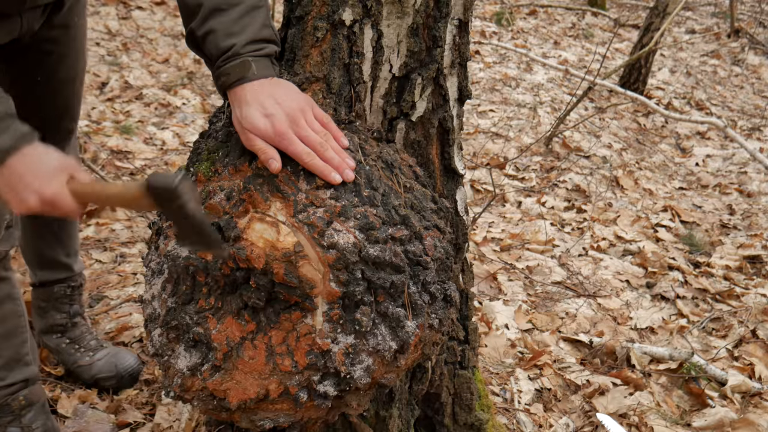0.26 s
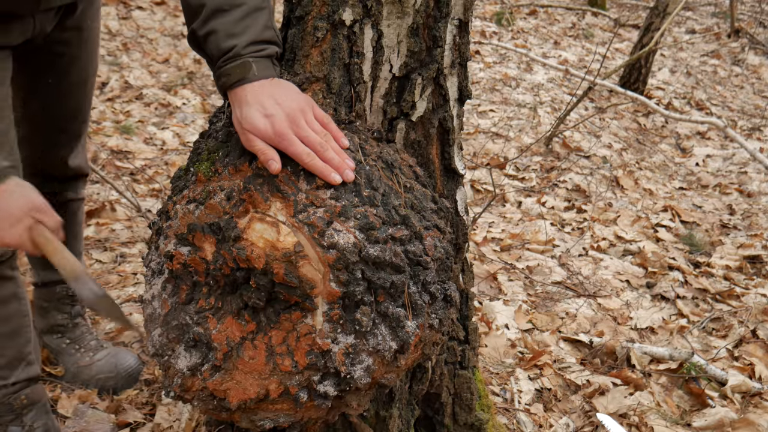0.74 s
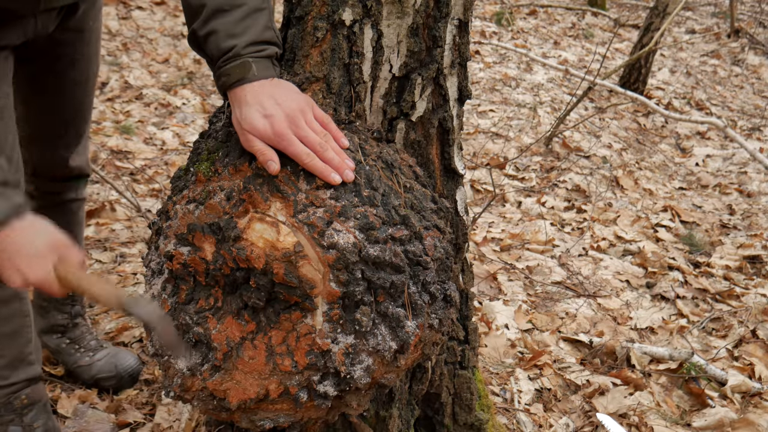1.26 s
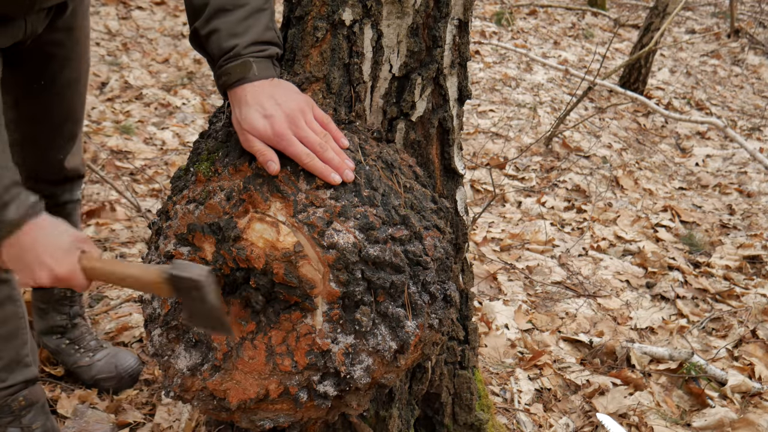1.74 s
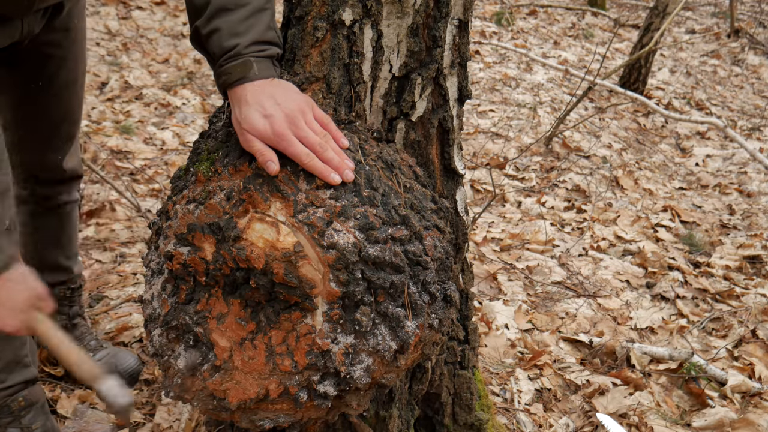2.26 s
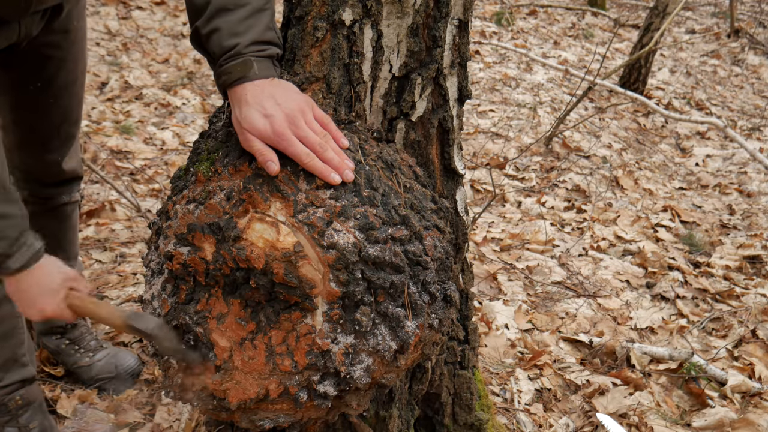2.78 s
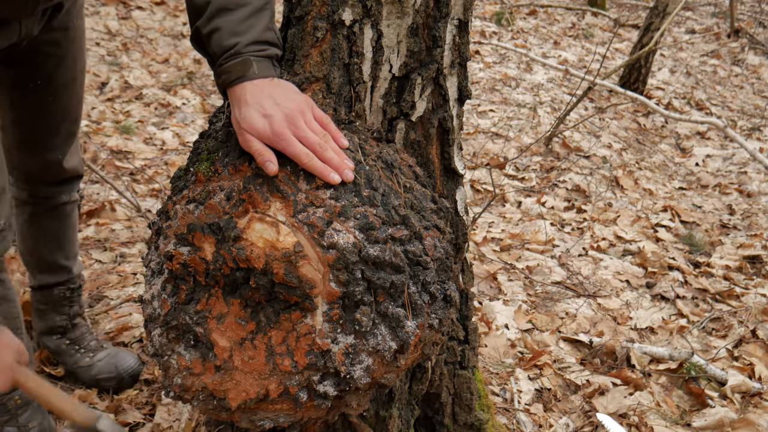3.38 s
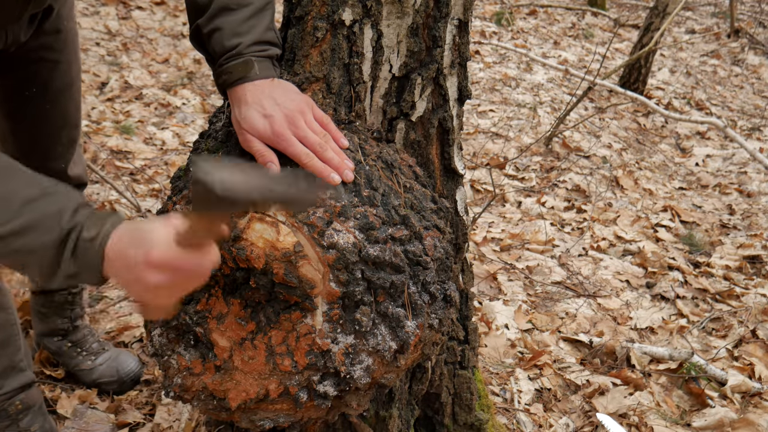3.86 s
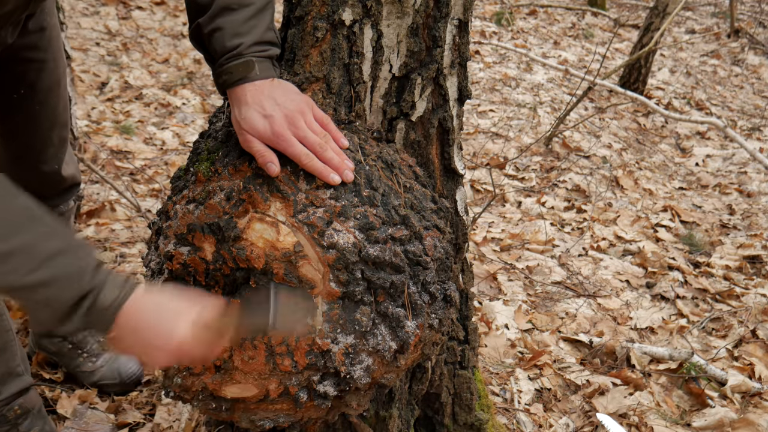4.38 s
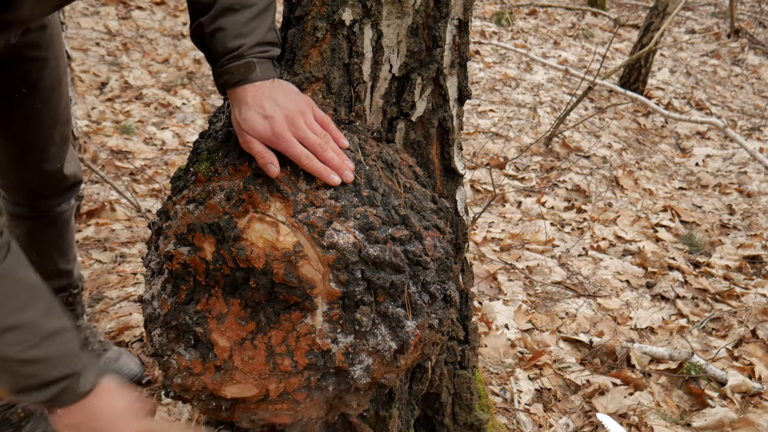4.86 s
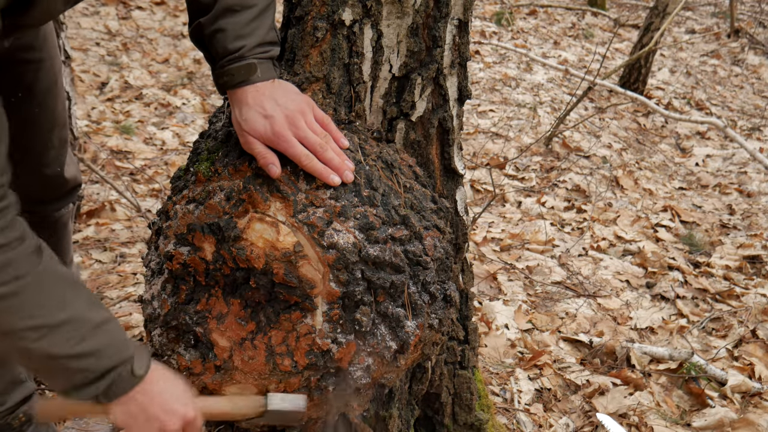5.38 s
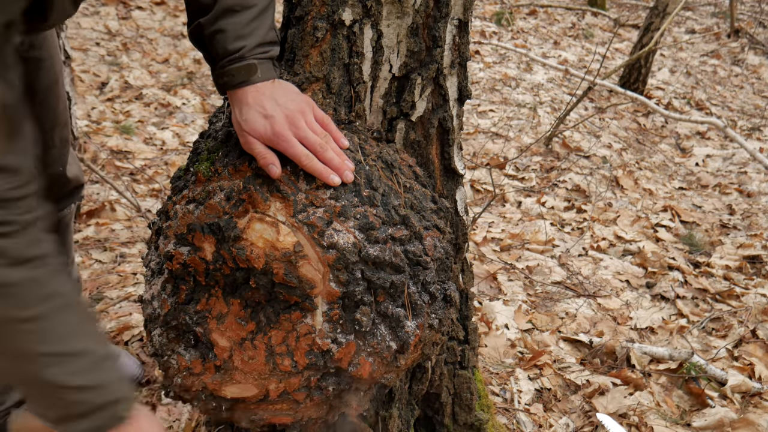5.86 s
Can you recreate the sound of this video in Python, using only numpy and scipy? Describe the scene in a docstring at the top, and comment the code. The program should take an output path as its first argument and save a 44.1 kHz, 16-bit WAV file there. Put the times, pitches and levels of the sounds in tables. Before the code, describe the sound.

Close, loud, cracking hatchet blows on a crusty tree growth, with sleeve swishes, falling chips and leaf crunches between them, over faint forest air.

```python
"""In a quiet forest, a hatchet chops a hard, crusty burl on a living tree, close to a stereo microphone.
Noise bursts crack the crust; damped modes ring crust, burl and steel; the loudest peaks clip flat.
Chips tick and ring; shaped noise makes the sleeve's swishes, dry leaves crunching and low booms.
Forest air and a light breeze lie behind as steady noise; the trees around add faint echoes to the blows."""
import sys
import numpy as np
from scipy import signal
from scipy.fft import rfft, irfft, next_fast_len
from scipy.io import wavfile
from scipy.ndimage import uniform_filter1d

SR = 44100
rng = np.random.default_rng(int(sys.argv[2]) if len(sys.argv) > 2 else 0)


def put_to_file(sound):
    """Save the sound as 16-bit audio at rate SR, in the file named by the first command-line argument."""
    columns = np.atleast_2d(sound).T  # one column per channel
    safe = np.clip(columns, -1, 1)
    whole_steps = np.round(safe * 32767)
    wavfile.write(sys.argv[1], SR, whole_steps.astype(np.int16))


N = 269892  # length in samples

# The forest air behind everything. Each row: frequency in Hz, relative level in dB.
FOREST_SPECTRUM = [(30, 9), (100, -5), (300, -5), (1000, -12.5), (2000, -13), (5000, -21.5), (15000, -30)]
# Light breeze on the microphone. Each row: frequency in Hz, relative level in dB.
BREEZE_SPECTRUM = [(8, -14), (20, -12), (40, -1.5), (100, -19), (400, -25.5), (2000, -45), (15000, -44)]
# Low booms around the blows and shifts of weight. Each row: start in seconds, level before the
# common trim in dB, decay time constant in seconds.
BOOMS = [(0, -41, 0.26), (.26, -37, 0.084), (.61, -39, 0.25), (1.07, -28.5, 0.12), (1.61, -32, 0.18),
         (1.89, -28, 0.048), (2.03, -40.5, 0.38), (2.71, -37, 0.2), (3.0, -30, 0.072), (3.3, -35, 0.12),
         (4.02, -31, 0.13), (4.21, -25, 0.097), (4.5, -31, 0.082), (4.72, -30.5, 0.15), (4.92, -35, 0.14),
         (5.23, -32.5, 0.14), (5.78, -45.5, 0.21)]
# Colour of the booms. Each row: frequency in Hz, relative level in dB.
BOOM_SPECTRUM = [(18, -59), (28, -21), (35, -1.5), (48, -32), (67, -6.5), (77, -11.5), (91, 1.5), (100, -4),
                 (115, -15.5), (160, -21.5), (400, -57), (2000, -79)]
# Dull thuds between the blows. Each row: start in seconds, pitch in Hz, peak level in dB,
# time from start to peak in seconds.
THUDS = [(0.225, 193, -26.5, 0.023), (1.914, 94, -28.5, 0.044), (3.039, 85, -25, 0.031),
         (4.236, 96.4, -28, 0.045), (4.748, 93, -22.5, 0.024)]
# The sleeve swishing as the arm moves. Each row: loudest moment in seconds, level before the common
# gains in dB, half length (standard deviation of the bell curve) in seconds.
SWISHES = [(0.018, -38, 0.075), (.44, -39, 0.068), (0.96, -36.5, 0.13), (1.456, -44, 0.25),
           (2.05, -37, 0.16), (2.382, -39.5, 0.11), (2.567, -39, 0.11), (2.966, -45, 0.14),
           (3.125, -44, 0.069), (3.453, -47, 0.24), (4.152, -39.5, 0.038), (4.505, -46.5, 0.022),
           (4.91, -45, 0.084), (5.056, -48, 0.15), (5.392, -39.5, 0.051), (5.58, -40, 0.14),
           (5.972, -38.5, 0.034)]
# Dry leaves and crumbs crunching. Each row: start in seconds, level before the common gains in dB,
# decay time constant in seconds, hiss relative to the body in dB before those gains.
CRUNCHES = [(.348, -27.5, .02, -7.5), (0.365, -28.5, .018, -9), (.595, -32.5, 0.018, -2.5),
            (0.784, -36.5, 0.047, -10), (.903, -28.5, 0.029, -18), (1.3, -60, 0.02, -13),
            (1.735, -35, 0.018, -14), (1.815, -34.5, 0.029, -11), (1.903, -25.5, 0.017, -10),
            (1.935, -31.5, 0.028, 0), (2.256, -30.5, 0.019, -12), (2.495, -24.5, 0.019, -14),
            (2.898, -27, 0.026, -10.5), (3.21, -32, 0.0078, 3), (3.298, -33.5, 0.018, 1),
            (3.33, -32, 0.028, -17), (4.03, -37, 0.011, 5), (4.225, -31.5, 0.037, -15),
            (4.277, -30, 0.04, -13), (4.713, -26.5, 0.079, -9), (5.221, -29.5, 0.013, -5),
            (5.318, -29.5, 0.029, -8), (5.774, -36, 0.06, -10), (5.885, -35, 0.021, -17)]
# Body of cloth and leaves. Each row: frequency in Hz, relative level in dB.
RUSTLE_SPECTRUM = [(25, -34), (80, -24), (250, -2.5), (500, -1.5), (1400, -1), (2800, -4), (5000, -5.5),
                   (6500, -17.5), (12000, -54)]
# Crisp top of cloth and leaves. Each row: frequency in Hz, relative level in dB.
LEAF_HISS_SPECTRUM = [(2500, -26), (5000, -3), (7000, -5), (10000, -8.5), (13000, -14), (15500, -25)]
# The largest chips and twigs landing. Each row: start in seconds, level before the common gain in dB,
# centre of the tick in Hz, length before stretching in seconds, ring in Hz, ring relative to the tick
# in dB before the ring gain.
LARGE_CHIPS = [(0.011, -23, 2150, 0.002, 2900, -3), (.23, -24, 1640, 0.0051, 910, -3.5),
               (0.251, -19, 2150, 0.0043, 1095, 0), (.287, -24, 3620, 0.0028, 3310, -3),
               (.326, -28.5, 4100, 0.0015, 3560, -5), (0.482, -25, 1600, 0.0039, 1025, -4),
               (.676, -21.5, 1500, 0.0023, 1200, -1.5), (0.706, -28, 1920, 0.0046, 1850, -1),
               (.733, -23.5, 3400, 0.0011, 3750, 3), (0.766, -19.5, 3100, 0.0037, 2100, 2),
               (.787, -15, 1730, .0052, 664, -6), (.826, -22.5, 2300, .0046, 5000, -5),
               (0.994, -24.5, 2400, 0.0022, 734, -7), (1.173, -22.5, 1760, 0.0045, 4970, -6.5),
               (1.289, -24.5, 4000, 0.002, 4640, 1), (1.315, -24, 2670, 0.0033, 5900, -11),
               (1.582, -15, 2170, 0.0029, 820, -4.5), (1.745, -21.5, 2420, 0.00085, 1980, -2),
               (1.842, -21.5, 2420, 0.0035, 2480, -6), (2.17, -22.5, 2500, 0.0016, 2900, -4),
               (2.21, -12.5, 1880, 0.00082, 1800, 6), (2.226, -25, 3900, 0.0017, 4830, 11),
               (2.315, -19, 1010, 0.0028, 510, 0.5), (2.417, -20, 1840, 0.0023, 770, -3),
               (2.426, -24.5, 1070, 0.0051, 1000, 0), (2.818, -26.5, 2210, 0.0044, 1290, -6),
               (3.025, -27.5, 1300, 0.011, 536, -7.5), (3.041, -21, 2200, 0.0025, 1340, -3),
               (3.08, -23, 1190, 0.0049, 870, -3), (3.364, -21.5, 4000, 0.0036, 4620, 0),
               (3.452, -27, 1170, 0.00085, 1390, -22), (4.181, -27.5, 700, 0.003, 470, 4),
               (4.22, -19, 2970, 0.0016, 3610, 2.5), (4.314, -23.5, 1950, 0.0025, 3150, -11),
               (4.391, -23, 1940, 0.0015, 1740, -5), (4.738, -22, 2300, 0.0022, 1870, 11),
               (4.81, -24.5, 1700, 0.0088, 640, -6.5), (5.014, -28.5, 2400, 0.0065, 2470, -2.5),
               (5.283, -22, 3380, 0.0017, 2910, -3), (5.306, -24, 2700, 0.0047, 2840, -7),
               (5.343, -21, 2180, 0.0042, 2040, -10), (5.38, -23, 2280, 0.0041, 3250, -6),
               (5.404, -23, 1670, 0.0063, 1280, -13), (5.433, -24.5, 2480, 0.0018, 4030, -3),
               (5.583, -19, 3070, 0.001, 3810, 2), (5.659, -29.5, 1600, 0.0013, 1350, 8),
               (5.786, -23, 1800, 0.0032, 1840, 1.5), (5.842, -25.5, 2560, 0.0024, 3200, -1),
               (5.891, -16.5, 1130, 0.0033, 838, -3)]
# Colour of a chip's tick before focusing. Each row: frequency in Hz, relative level in dB.
CHIP_SPECTRUM = [(30, -36), (100, 11), (500, 7), (1500, -1.5), (5000, -2.5), (6200, -5.5), (10000, -5),
                 (15500, -16.5)]
# Hatchet blows. Each row: start in seconds, crack level in dB, crack tilt in dB per octave, time the edge
# keeps biting in seconds, low crust note in Hz, its level in dB, high crust note in Hz, its level in dB,
# burl level in dB, pitch the burl favours in Hz, steel level in dB, crumbling level in dB.
BLOWS = [(0.0994, -3.5, -0.5, 0.0014, 1010, 2, 1565, -0.5, -14, 179, -18, -22.5),
         (0.562, -6.5, -0.5, 0.0011, 892, 3.5, 1699, 4, -20, 150, -18.5, -10),
         (1.0717, 0.5, 1, 0.002, 678, -5, 897, -1.5, -1, 384, -22, -43),
         (1.6017, -3.5, 1, 0.0046, 1270, -7.5, 1917, -0.5, -11.5, 407, -9, -25.5),
         (2.1166, -3, 1.5, 0.003, 710, -5, 2970, 0, -11.5, 316, -7, -19),
         (2.6984, -3.5, -0.4, 0.0052, 665, -12, 3405, 1.5, -11.5, 470, -18, -22),
         (3.197, -7.5, -0.5, 0.00075, 725, -5.5, 2420, -7.5, -18, 267, -35, -50),
         (3.203, -8, 1.5, 0.0044, 1010, -10, 2395, -0.5, -28, 280, -17, -15.5),
         (4.0136, -3.5, -2.5, 0.0031, 610, -4, 1046, -5.5, -9.5, 337, -26, -11),
         (4.609, -7.5, -1.7, 0.002, 710, -5, 1950, -2.5, -33, 169, -11, -33),
         (4.615, -3.5, 0.5, 0.0024, 1140, -12, 2570, -10, -14, 298, -13.5, -29),
         (4.6226, -22, -5, 0.0017, 1160, -18, 3200, -6.5, -29, 300, -19.5, -25),
         (4.6378, -16, 0, 0.0022, 1270, -12, 2230, -8, -20, 326, -22.5, -31),
         (5.186, -8, 0.3, 0.0072, 1816, -8.5, 3180, -1.5, -11.5, 272, -14, -17),
         (5.6899, -8, -0.4, 0.0049, 740, -8, 2730, -16, -15, 250, -12.5, -11.5)]
# Colour of the crack before tilting. Each row: frequency in Hz, relative level in dB.
CRACK_SPECTRUM = [(30, -46), (90, -14.5), (200, -15.5), (700, -2), (1400, -2), (2000, -0.5), (3200, 1),
                  (4300, -2), (5000, 0.5), (5900, -10.5), (7000, -3), (10000, -7), (15500, -19.5)]
# Each crust note is a tight cluster of modes. Each row: multiple of the note, level in dB, t60 in seconds.
CRUST_MODES = [(0.872, -16.5, 0.0255), (0.999, -2.5, 0.027), (1.102, -8.5, 0.036), (1.206, -3.5, 0.021)]
# The burl on its trunk. Each row: mode in Hz, level in dB, t60 in seconds.
BURL_MODES = [(189, -14.5, 0.14), (240.5, -12.5, 0.13), (276, 6, 0.024), (346, -10, 0.14),
              (427.7, -9.5, 0.13), (492, -16, 0.13), (643, -4.5, 0.082), (716, -22, 0.12)]
# The steel head, damped by the cut. Each row: mode in Hz, level in dB, t60 in seconds.
STEEL_MODES = [(1850, -13, 0.034), (2610, -19, 0.11), (2949, 3, 0.02), (3010, -1.5, 0.053),
               (3610, 4, 0.023), (3750, 3, 0.028), (4920, -15, 0.064), (4580, -27, 0.028),
               (6440, -8, 0.043), (6800, -20, 0.056)]
# Colour of the crumbling crust. Each row: frequency in Hz, relative level in dB.
CRUMBLE_SPECTRUM = [(50, -44), (200, -7), (1000, 0), (3800, 3.5), (5900, -6), (7200, 1), (11000, -8),
                    (15500, -17)]
# The steel head grazing the bark as it is drawn away. Each row: start in seconds, level in dB,
# decay time constant of the rub in seconds.
GRAZES = [(0.249, -35, 0.0022), (4.23, -50, 0.0029), (5.228, -22.5, 0.01), (5.283, -31.5, 0.004)]


def undb(db):
    """Turn decibels into an amplitude factor."""
    return 10 ** (np.asarray(db) / 20)


def unit(x):
    """Scale to rms 1."""
    return x / np.sqrt(np.mean(x ** 2) + 1e-18)


def colour(x, points):
    """Causal minimum-phase filter through (Hz, dB) points; the result has rms 1."""
    size = 2 * next_fast_len(len(x) // 2 + 1024, True)
    hz, db = np.transpose(points)
    f = np.maximum(np.fft.rfftfreq(size, 1 / SR), 1)
    level_db = np.interp(np.log(f), np.log(hz), db)
    # folding the cepstrum onto positive time makes the filter causal
    cepstrum = irfft(np.log(undb(level_db)))
    cepstrum[1:size // 2] *= 2
    cepstrum[size // 2 + 1:] = 0
    response = np.exp(rfft(cepstrum))
    return unit(irfft(rfft(x, size) * response)[:len(x)])


def add(track, s, sound):
    """Mix a sound in at time s."""
    i = max(int(s * SR), 0)
    track[i:i + len(sound)] += sound[:N - i]


def crackle(size, rate, spread_db, smooth):
    """Tiny fractures of very unequal strength, rate per second, over a smooth hiss."""
    strength = undb(spread_db * np.minimum(rng.exponential(size=size), 4.5))
    clicks = (rng.random(size) < rate / SR) * strength * rng.choice([-1, 1], size)
    return unit(unit(clicks) + smooth * rng.standard_normal(size))


def ring(modes, t, scatter_db, detune):
    """Damped modes; each point of impact weights and tunes them a little differently."""
    hz, db, t60 = np.transpose(modes)[:, :, None]
    weight, tuning, sign = rng.standard_normal((3, len(modes), 1))
    waves = np.sign(sign) * np.sin(2 * np.pi * hz * (1 + detune * tuning) * t)
    strength = undb(db + scatter_db * np.clip(weight, -1, 1))
    decay = np.exp(-np.log(1000) * t / t60)
    return np.sum(strength * decay * waves, axis=0)


def swell(s, rise_s, fall_s):
    """An envelope that rises from time s to 1 and then dies away."""
    t = np.arange(N) / SR - s
    return np.clip(t / rise_s, 0, 1) * np.exp(-np.maximum(t - rise_s, 0) / fall_s)


def flutter(rate, depth_db):
    """A quickly wandering gain, with rate random points per second."""
    knots = rng.standard_normal(int(N / SR * rate) + 2)
    wander = np.interp(np.arange(N) / SR * rate, np.arange(len(knots)), knots)
    return unit(undb(depth_db * wander))


def shifting(x, depth_db):
    """Ever different leaves are touched, so half-octave bands flicker on their own."""
    octave = np.log2(np.maximum(np.fft.rfftfreq(N, 1 / SR), 1))
    # the end bands also take everything below and above them
    place = np.clip(2 * (octave - 8.5), 0, 10)
    spectrum = rfft(x)
    bands = (irfft(spectrum * np.maximum(1 - abs(place - k), 0), N) for k in range(11))
    return unit(sum(band * flutter(rate=130, depth_db=depth_db) for band in bands))


def diffuse(x, db, t60, treble_db):
    """Smear a sound by convolving it with a decaying, coloured crackle."""
    t = np.arange(SR // 2) / SR
    tone = [(100, 11.5), (500, -11.5), (3000, -9.5), (12000, treble_db)]
    scatter = colour(crackle(len(t), rate=1900, spread_db=5.0, smooth=0.56), tone)
    tail = scatter * np.exp(-np.log(1000) * t / t60)
    tail = tail / np.sqrt(np.sum(tail ** 2))
    return undb(db) * signal.fftconvolve(x, tail)[:N]


def forest(level_db=-47.5):
    """The quiet air of the forest is steady, dark noise."""
    return undb(level_db) * colour(rng.standard_normal(N), FOREST_SPECTRUM)


def breeze(level_db=-52):
    """A light breeze on the microphone is low, steady noise."""
    return undb(level_db) * colour(rng.standard_normal(N), BREEZE_SPECTRUM)


def rumble(trim_db=-1, boom_rise_s=0.055):
    """Low noise booms swell and die away, and soft thuds are single short pulses of a low tone."""
    powers = ((undb(db) * swell(s, boom_rise_s, fall_s)) ** 2 for s, db, fall_s in BOOMS)
    loudness = np.sqrt(sum(powers))
    boom = colour(rng.standard_normal(N), BOOM_SPECTRUM)
    # even out the noise so that the swells alone set its loudness
    boom = boom / np.sqrt(uniform_filter1d(boom ** 2, SR // 10) + 1e-6)
    out, t = boom * loudness * undb(trim_db), np.arange(SR // 4) / SR
    for s, hz, db, peak_s in THUDS:
        rise = (t / peak_s) ** 2
        add(out, s, undb(db) * rise * np.exp(1 - rise) * np.sin(2 * np.pi * hz * t))
    return out


def snaps(rate=60, spread_db=2.0, fall_s=0.0016):
    """Leaf ribs snap at random; each snap is a noise burst dying within milliseconds."""
    strength = undb(spread_db * np.minimum(rng.exponential(size=N), 2.5))
    starts = (rng.random(N) < rate / SR) * strength
    envelope = signal.lfilter([1], [1, -np.exp(-1 / (fall_s * SR))], starts)
    return unit(envelope * rng.standard_normal(N))


def litter(rustle_gain_db=1.35, hiss_gain_db=2.9, snap_db=-5, swish_hiss_db=-7.5, idle_db=-55,
           crunch_rise_s=0.0093):
    """Cloth swishes with the arm and dry leaves crunch in small fits, with crisp crackles on top."""
    t = np.arange(N) / SR
    # each move is an envelope and its relative hiss in dB
    moves = []
    for s, db, half_s in SWISHES:
        moves.append((undb(db) * np.exp(-((t - s) / half_s) ** 2 / 2), swish_hiss_db))
    for s, db, fall_s, bright_db in CRUNCHES:
        moves.append((undb(db) * swell(s, crunch_rise_s, fall_s), bright_db))
    moves.append((undb(idle_db), swish_hiss_db))  # the litter at rest
    body = np.sqrt(sum(size ** 2 for size, _ in moves))
    hiss = np.sqrt(sum((size * undb(bright_db)) ** 2 for size, bright_db in moves))
    fits = flutter(rate=370, depth_db=3.5)
    grains = crackle(N, rate=1500, spread_db=3.5, smooth=0.88) * fits + undb(snap_db) * snaps()
    grains = shifting(grains, depth_db=5.0)
    crisp = shifting(crackle(N, rate=2000, spread_db=5, smooth=1.0) * fits, depth_db=-0.5)
    rustle = undb(rustle_gain_db) * body * colour(grains, RUSTLE_SPECTRUM)
    return rustle + undb(hiss_gain_db) * hiss * colour(crisp, LEAF_HISS_SPECTRUM)


def small_chips(count=3, scatter_falls=1.1, level_db=1, spread_db=1.5, centre_hz=2660, spread_octaves=0.54,
                length_s=0.0017, ring_db=-6):
    """A few small chips tick one after another as each spill of crumbs crunches into the leaves."""
    rows = []
    for s, db, fall_s, _ in CRUNCHES:
        for k, (late, strength, size, note) in enumerate(rng.uniform(-1, 1, (count, 4))):
            # the mean delay is scatter_falls times the decay of the crunch
            delay_s = scatter_falls * fall_s * (2 * k + 1 + late) / count
            tick_hz, ring_hz = centre_hz * 2 ** (spread_octaves * np.array([size, note]))
            chip_db = db + level_db + spread_db * strength
            rows.append((s + delay_s, chip_db, tick_hz, length_s, ring_hz, ring_db))
    return rows


def chips(gain_db=2.3, focus_db=5.5, stretch=1.36, ring_gain_db=3.0, ring_stretch=1.05):
    """Each chip makes a short dry tick of crackling noise and rings briefly at its own note."""
    out, t = np.zeros(N), np.arange(SR // 20) / SR
    for s, db, centre_hz, length_s, ring_hz, ring_db in LARGE_CHIPS + small_chips():
        # the tick loses focus_db per octave away from its centre
        tone = [(hz, level - focus_db * abs(np.log2(hz / centre_hz))) for hz, level in CHIP_SPECTRUM]
        tick = colour(crackle(len(t), rate=5000, spread_db=3.0, smooth=0.63), tone)
        tick = tick * np.exp(-t / (stretch * length_s))
        note = np.sin(2 * np.pi * ring_hz * t) * np.exp(-t / (ring_stretch * length_s))
        share = undb(ring_db)
        chip = (tick + undb(ring_gain_db) * share * note) / np.hypot(1, share)
        add(out, s, undb(db + gain_db) * chip)
    return out


def crack(t, tilt_db, bite_s, fall_s=0.0029):
    """Fibres break at full strength while the edge bites, then the fracture noise dies away."""
    # hard crust cracks brighter than the corky inside
    tone = [(hz, db + tilt_db * np.log2(hz)) for hz, db in CRACK_SPECTRUM]
    bite = np.exp(-np.maximum(t - bite_s, 0) / fall_s)
    return colour(crackle(len(t), rate=6000, spread_db=4.5, smooth=0.58), tone) * bite


def crust(t, notes):
    """The crust rings at two notes, each a cluster of short-lived modes."""
    modes = [(k * hz, db + level, t60) for hz, level in notes for k, db, t60 in CRUST_MODES]
    return ring(modes, t, scatter_db=-0.4, detune=0.0055)


def burl(t, pitch_hz, rise_s=0.0056, focus_db=7, thump_db=-9, thump_fall_s=0.011):
    """The burl knocks in damped modes over a short thump of the trunk."""
    rise = 1 - np.exp(-t / rise_s)
    # the point of impact favours some modes over others
    favoured = [(hz, db - focus_db * abs(np.log2(hz / pitch_hz)), t60) for hz, db, t60 in BURL_MODES]
    knock = ring(favoured, t, scatter_db=0.5, detune=0.025) * rise
    # the trunk's many damped modes merge into one band of noise
    band = [(pitch_hz / 3, -30), (pitch_hz / 1.85, -2), (pitch_hz * 1.53, 0), (pitch_hz * 4, -36)]
    thump = colour(rng.standard_normal(len(t)), band) * np.exp(-t / thump_fall_s) * rise
    return knock + undb(thump_db) * thump


def crumbs(t, fall_s=0.013):
    """Crumbs break away from the cut in a dying crackle."""
    grains = crackle(len(t), rate=3100, spread_db=5.0, smooth=0.57)
    return colour(grains, CRUMBLE_SPECTRUM) * np.exp(-t / fall_s)


def hatchet():
    """The edge breaks fibres while it bites; crust, burl and steel ring on as crumbs break away."""
    out, t = np.zeros(N), np.arange(SR // 6) / SR
    for (s, crack_db, tilt_db, bite_s, low_hz, low_db, high_hz, high_db,
         burl_db, burl_hz, steel_db, crumble_db) in BLOWS:
        blow = undb(crack_db) * crack(t, tilt_db, bite_s)
        blow += crust(t, [(low_hz, low_db), (high_hz, high_db)])
        blow += undb(burl_db) * burl(t, burl_hz)
        blow += undb(steel_db) * ring(STEEL_MODES, t, scatter_db=8.5, detune=0.0052)
        blow += undb(crumble_db) * crumbs(t)
        add(out, s, blow)
    return out


def trunks(blows):
    """The surrounding trees and their roots return faint scattered echoes of the blows."""
    return diffuse(blows, db=-33, t60=0.99, treble_db=-14)


def grazes():
    """A brief rough rub sets the steel modes going."""
    out, t = np.zeros(N), np.arange(SR // 10) / SR
    for s, db, length_s in GRAZES:
        rub = rng.standard_normal(len(t)) * np.exp(-t / length_s)
        rub = rub / np.sqrt(np.sum(rub ** 2))
        steel = ring(STEEL_MODES, t, scatter_db=-3.0, detune=0.014)
        add(out, s, undb(db) * signal.fftconvolve(rub, steel))
    return out


def scene(width_db=-28):
    """All the work is straight ahead; the side signal enters the two channels with opposite signs."""
    blows = hatchet() + grazes()
    work = blows + chips() + litter()
    mid = work + trunks(blows) + rumble() + forest()
    # a faint, treble-heavy width follows the sound
    width = undb(width_db) * (np.roll(mid, 1) - np.roll(mid, -1))
    # a faint, short, diffuse spread widens the work
    spread = diffuse(work, db=-49.5, t60=0.16, treble_db=-8)
    side = width + spread + breeze()
    return mid + side * np.array([[1], [-1]])


def record(dry, low_cut_hz=27, top_hz=15900):
    """The microphone sheds the lowest bass, peaks clip flat at full scale, and the top is cut."""
    low_cut = signal.butter(4, low_cut_hz, "high", fs=SR, output="sos")
    heard = signal.sosfilt(low_cut, dry)
    clipped = np.clip(heard, -1, 1)
    top_cut = signal.ellip(8, .1, 60, top_hz, fs=SR, output="sos")
    return signal.sosfiltfilt(top_cut, clipped)


dry = scene()
out = record(dry)
put_to_file(out)
```